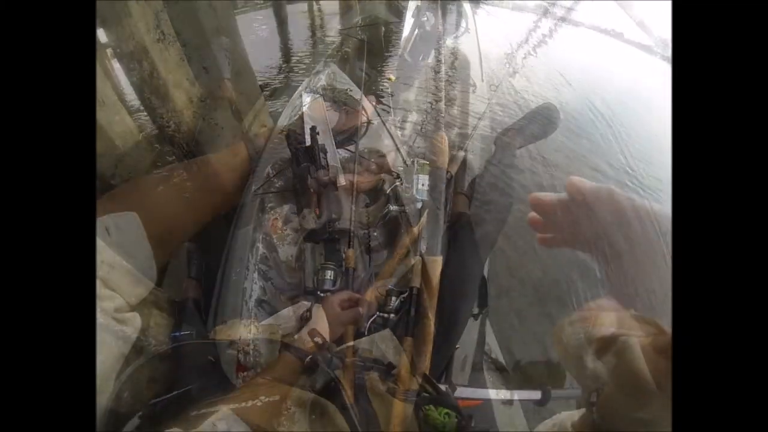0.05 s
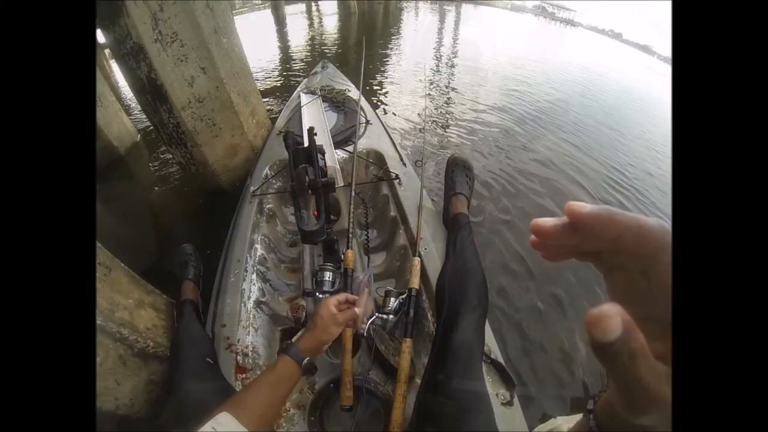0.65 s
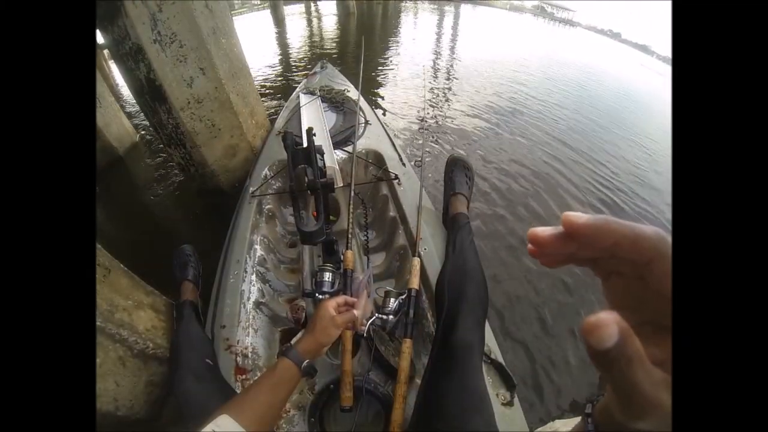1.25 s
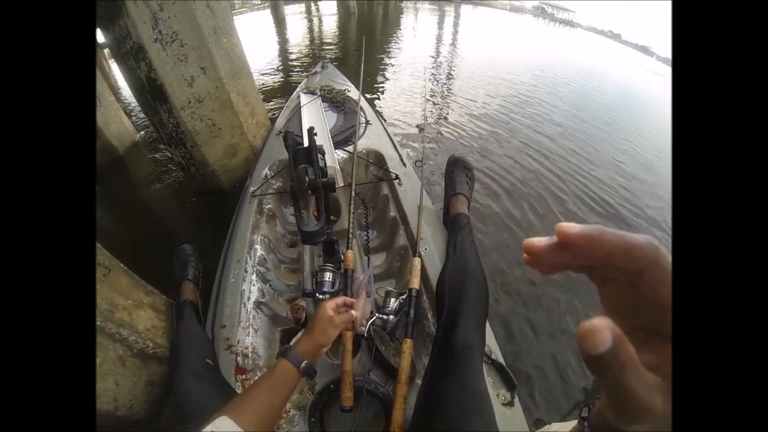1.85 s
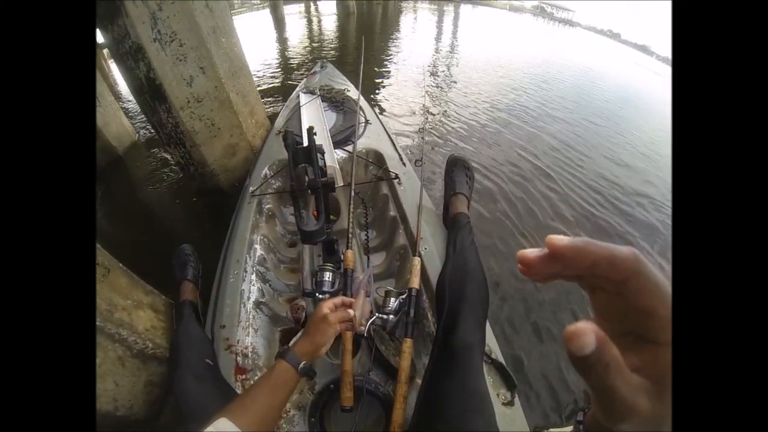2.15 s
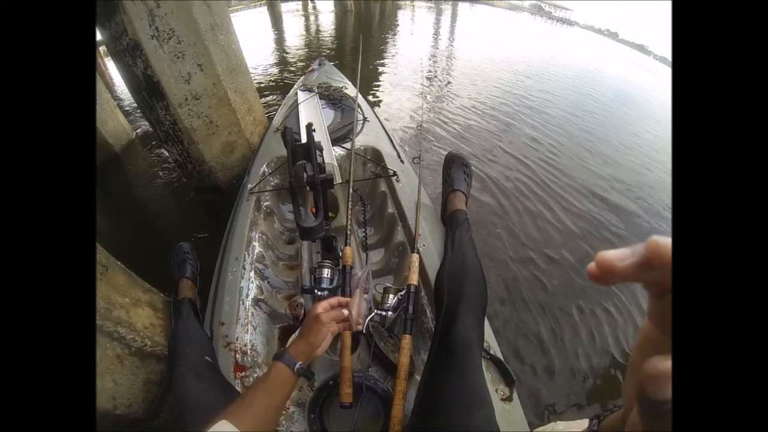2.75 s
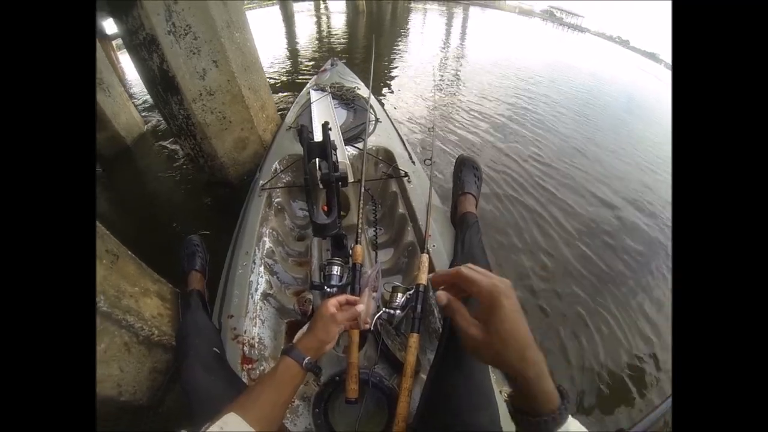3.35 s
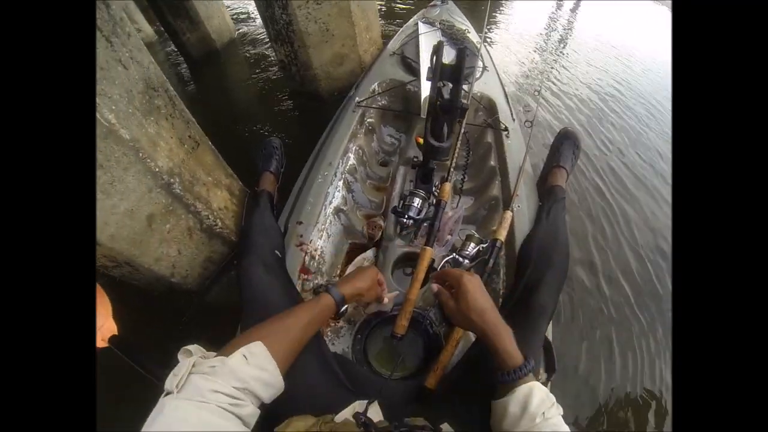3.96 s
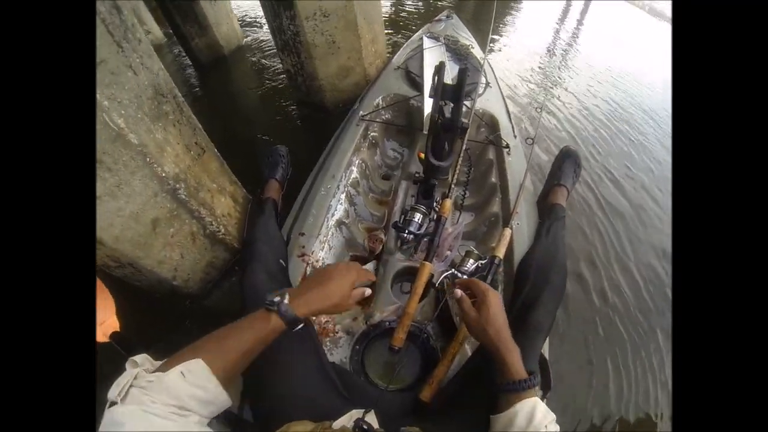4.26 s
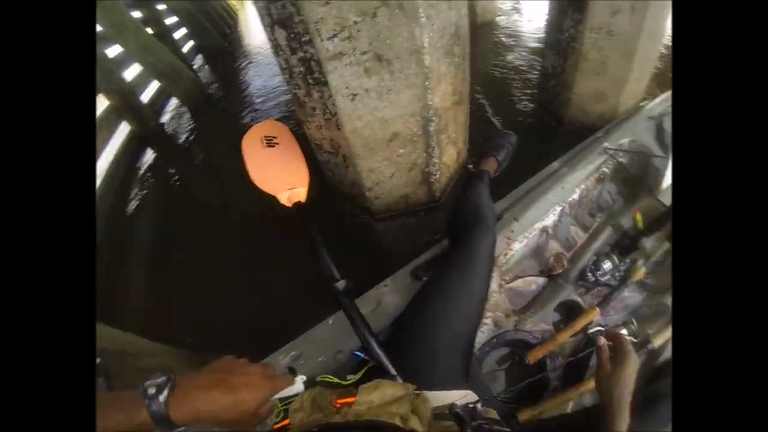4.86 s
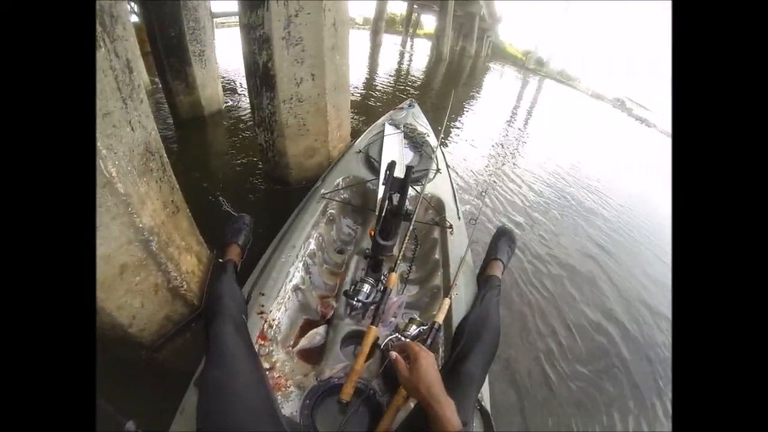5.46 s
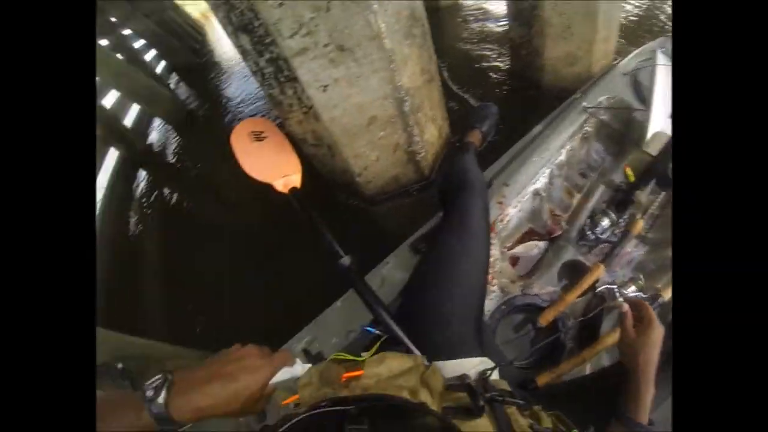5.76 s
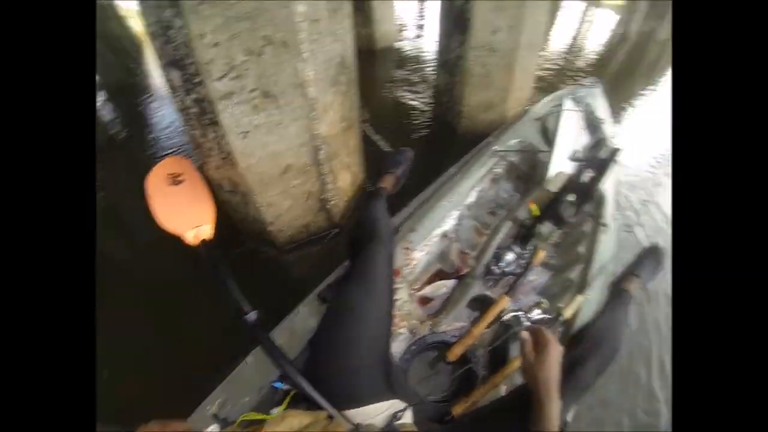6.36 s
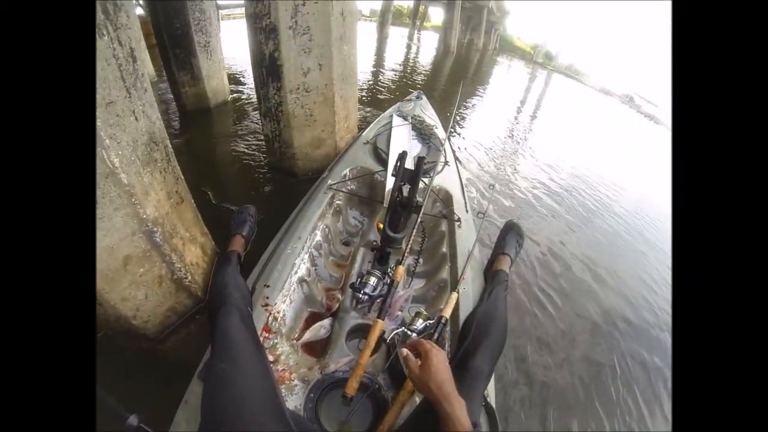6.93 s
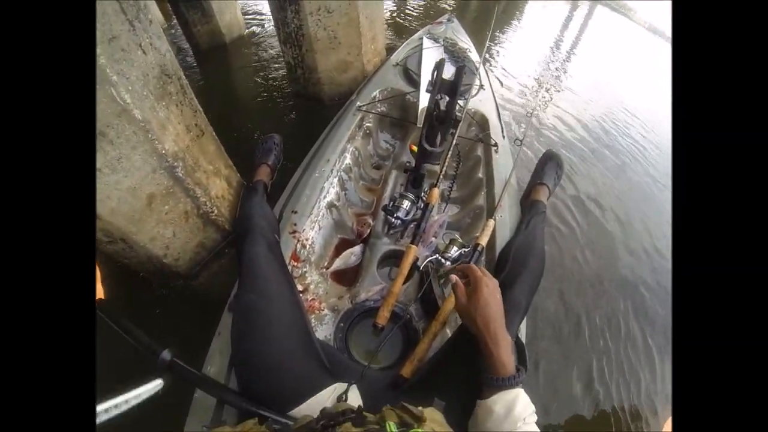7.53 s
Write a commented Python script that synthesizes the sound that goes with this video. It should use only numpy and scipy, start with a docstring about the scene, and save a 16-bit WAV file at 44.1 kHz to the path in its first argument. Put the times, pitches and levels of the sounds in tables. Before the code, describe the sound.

A brief burst of close, hollow knocks, scrapes, low thumps and clothing rustle opens, heard through a plastic camera housing in a kayak. It cuts to the low, steady rumble of a road bridge above, where a heavy engine slowly sinks in pitch and two vehicles pass in turn. Occasional light knocks of gear sound nearby, over a very faint, high, pulsing whine.

```python
"""Under a road bridge, in a kayak, heard by a camera in a plastic housing. Gear is handled: knocks and scrapes
ring the housing, the mount thumps, clothing rustles; then the scene changes. Traffic rumbles overhead: two
vehicles cross the span and a heavy engine coasts down. A few light knocks follow. The camera's electronics add
a faint, high, pulsing whine."""
import sys
import numpy as np
from scipy import signal
from scipy.fft import rfft, irfft, next_fast_len
from scipy.io import wavfile
from scipy.ndimage import uniform_filter1d

SR = 44100
rng = np.random.default_rng(int(sys.argv[2]) if len(sys.argv) > 2 else 0)


def master(y):
    """Save y as 16-bit WAV."""
    cut = np.clip(np.atleast_2d(y).T, -1, 1)
    pcm = np.round(cut * 32767)  # scale
    wavfile.write(sys.argv[1], SR, pcm.astype(np.int16))


N = 339129
TIME = np.arange(N) / SR
HANDLING_END_S, BAND_LIMIT_HZ = 0.773, 14900


# Each row: start in seconds, peak in dB, low-mode weight in dB, cut-off in Hz.
HOUSING_KNOCKS = [(0.2855, -35, -14, 7500), (0.286, -14.5, 8.5, 5700), (0.307, -29.5, -7, 2410),
                  (0.3466, -9.5, -5, 2100), (0.4105, -34.5, 4, 3200), (0.664, -24.5, -3.5, 2050),
                  (0.7498, -23.5, -25, 4460), (5.1094, -34, 3, 1760), (5.7296, -25.5, -1.5, 1810),
                  (6.9220, -45, 14, 1900), (7.2900, -33, 2.5, 1750)]

def knocks():
    """Gear strikes the housing; harder contact has a higher cut-off."""
    out = np.zeros(N)
    for start_s, db, low_db, cutoff_hz in HOUSING_KNOCKS:
        add(out, start_s, amp(db) * housing(low_db, cutoff_hz))
    return out


# Each row: frequency in Hz, swell in seconds, relative level in dB.
HOUSING_MODES = [(302, 0.003, -33), (477, 0.0023, -22), (682, 0.0027, -15.5), (942, 0.002, -26),
                 (1330, 0.0017, -17.5), (1504, 0.00072, -2), (1885, 0.00045, -18), (3140, 0.00068, -24),
                 (3754, 0.0015, -29), (4980, 0.00036, -27.5), (6360, 0.00028, -32)]

def housing(low_db, cutoff_hz, bright_db_per_oct=0):
    """One blow, peak 1: heavy blows favour the low modes, soft contact cuts the high ones."""
    low, high = 0, 0
    for hz, swell_s, db in HOUSING_MODES:
        if hz < 1000:
            low += amp(db + low_db) * ring(hz, swell_s)
        else:
            tilt_db = bright_db_per_oct * max(np.log2(hz / 1600), 0)
            high += amp(db + tilt_db) * ring(hz, swell_s)
    stiff_walls = signal.butter(5, 1120, "high", fs=SR, output="sos")
    contact = signal.butter(4, min(cutoff_hz, BAND_LIMIT_HZ), fs=SR, output="sos")
    out = signal.sosfilt(contact, low + signal.sosfilt(stiff_walls, high))
    return out / abs(out).max()


# Each row: start in seconds, envelope peak in dB, frequency in Hz, swell in seconds.
MOUNT_THUMPS = [(0.032, -23, 46, 0.01), (0.051, -20, 62, 0.0072), (0.206, -14.5, 21, 0.0054),
                (0.255, -15, 44.5, .009), (0.2883, -6.5, 53.4, 0.0087), (0.601, -24, 45, 0.013),
                (0.667, -30, 38, 0.009), (0.697, -14, 42.8, 0.013), (0.735, -24, 40, 0.0054),
                (3.366, -29, 25, 0.03), (3.373, -32, 66, 0.0058), (4.49, -33, 30, 0.028)]
TACKLE_TICKS = [(0.0363, -33.5, 1390, 0.001), (0.0360, -43, 2920, 0.00035), (0.195, -28, 1340, 0.0027),
                (0.537, -47, 1700, 0.0011), (0.5505, -54, 5440, 0.00024), (0.7476, -19.5, 1850, 0.0006),
                (1.307, -52, 2900, 0.00049), (1.316, -39, 2580, 0.00025), (1.3235, -59, 4730, .0004),
                (6.657, -47, 3400, .0008)]

def taps(rows):
    """Each tap rings one damped mode: low for the mount, high for tackle."""
    out = np.zeros(N)
    for start_s, db, hz, swell_s in rows:
        add(out, start_s, amp(db) * ring(hz, swell_s))
    return out


# Each row: start in seconds, length in seconds (capped at 0.1), rms in dB, low-mode weight in dB,
# brightness in dB per octave, cut-off in Hz.
HOUSING_SCRAPES = [(0.010, 0.13, -49, 2, 5, 7500), (0.03, 0.016, -46.5, 3, 8, 4500),
                   (0.126, 0.031, -36, -2.5, 6.5, 6500), (0.180, 0.026, -35, -36, 8, 11000),
                   (0.21, 0.0064, -44, -12, 8, 8000), (0.701, 0.012, -45.5, -2, 7.5, 13000),
                   (0.72, 0.023, -71, -10, -1, 11000)]

def scrapes(slips_per_s=5000):
    """Dense tiny slips ring the housing as something slides over it."""
    out, max_size = np.zeros(N), SR // 10
    for start_s, length_s, db, low_db, bright_db_per_oct, cutoff_hz in HOUSING_SCRAPES:
        slips = rng.standard_normal(max_size) * (rng.random(max_size) < slips_per_s / SR)
        size = min(int(length_s * SR), max_size)
        stroke = slips[:size] * signal.windows.tukey(size, 0.5)
        sound = signal.fftconvolve(stroke, housing(low_db, cutoff_hz, bright_db_per_oct))
        rms = np.sqrt(np.sum(sound ** 2) / size + 1e-20)
        add(out, start_s, amp(db) * sound / rms)
    return out


# Each row: frequency in Hz, relative level in dB.
SWAY_SPECTRUM = [(8.8, -30), (15, 14), (23, 5.5), (33, -0.5), (114, -23), (145, -18), (219, -43),
                 (300, -31.5), (390, -61), (660, -120)]
RUSTLE_SPECTRUM = [(120, 4.5), (200, 1.5), (480, -9), (760, -7), (1000, -13.5), (1540, 1), (2200, -16),
                   (3800, -22), (4500, -32), (5500, -26), (7500, -34), (8500, -38.5), (13000, -42.5)]

def handling(grip_s=0.11, grip_db=5.5):
    """The mount sways and clothing rustles; the grip tightens just before the end."""
    grip = amp(grip_db * ramp(HANDLING_END_S - grip_s, grip_s))
    folds_db = 1.7 * drift(40)
    sway = amp(-29.5) * noise(SWAY_SPECTRUM)
    rustle = amp(-49.5 + folds_db) * noise(RUSTLE_SPECTRUM)
    return grip * (sway + rustle)


# Each row: arrival in seconds, approach in seconds, tyres in dB, roar in dB, hold in seconds,
# fade in dB per second, engine note in Hz, note width in Hz, note in dB.
SPAN_VEHICLES = [(3.007, 0.74, -55, -57, 1.26, 5.5, 157.4, 11, -58),
                 (6.231, .3, -55.5, -57.5, 1.05, 9, 143.7, 4.5, -53)]
# Each row: frequency in Hz, relative level in dB.
ROAR_SPECTRUM = [(94, -15), (160, -2), (183, -4), (230, -7.5), (290, -6), (384, -12), (434, -8), (521, -11),
                 (630, -9.5), (920, -16.5), (1070, -16.5), (1150, -14), (1500, -57), (2530, -120)]

def traffic(far_roar_db=-65.5):
    """Vehicles roar across the span over distant traffic; the uneven road flutters roar and tyres."""
    gain = amp(far_roar_db)
    for start_s, _, _, roar_db, hold_s, fade_db_per_s, *_ in SPAN_VEHICLES:
        gain = power_sum(gain, amp(roar_db) * crossing(start_s, hold_s, fade_db_per_s))
    flutter = drift(25)
    rumble = deck_rumble()
    roar = gain * amp(0.86 * flutter) * noise(ROAR_SPECTRUM)
    return rumble + roar + amp(0.54 * flutter) * tyres()


# Each row: frequency in Hz, relative level in dB.
DECK_SPECTRUM = [(12, -6), (24, 2), (36, -1), (60, -13), (100, -21), (160, -25), (260, -45)]

def deck_rumble(far_db=-54, loaded_db=-44.5, lag_s=0.23):
    """The first vehicle loads the deck, which rumbles on."""
    loaded = crossing(SPAN_VEHICLES[0][0] + lag_s, hold_s=0, fade_db_per_s=0)
    return np.maximum(amp(far_db), amp(loaded_db) * loaded) * noise(DECK_SPECTRUM)


# Each row: frequency in Hz, relative level in dB.
TYRE_SPECTRUM = [(590, -4.5), (1000, -20.5), (1230, -0.5), (1330, -0.5), (1440, 5.5), (1510, 7.5),
                 (1620, 3.5), (1850, -13), (2000, -16.5), (2600, -43), (4400, -120)]
SIZZLE_SPECTRUM = [(1180, -9.5), (2000, -5.5), (2210, -2.5), (2390, -1.5), (2590, -9), (2720, -10.5),
                   (2930, -1), (3040, 1), (3280, -6), (3620, -2.5), (3970, -12), (4300, -17.5), (5250, -13),
                   (5900, -19), (6100, -15.5), (7930, -22), (13400, -120)]

def tyres(far_roll_db=-61, far_sizzle_db=-72.5, nearest_s=5.52, width_s=2.8):
    """A stream of tyres swells and ebbs once; each vehicle peaks, then the deck screens it."""
    stream = ramp(start_s=1.67, length_s=0.28) / np.hypot(1, (TIME - nearest_s) / width_s)
    roll = power_sum(amp(far_roll_db), amp(-60) * stream)
    sizzle = power_sum(amp(far_sizzle_db), amp(-64) * stream)
    for start_s, approach_s, tyres_db, *_ in SPAN_VEHICLES:
        past_peak_s = TIME - start_s - 0.27
        slope_s = np.where(past_peak_s < 0, approach_s, 0.2)
        roll = power_sum(roll, amp(tyres_db) / (1 + (past_peak_s / slope_s) ** 2))
    return roll * noise(TYRE_SPECTRUM) + sizzle * noise(SIZZLE_SPECTRUM)


def span_boom(peak_s=3.03, width_s=0.63):
    """A low, narrow resonance of the span swells as the first vehicle arrives."""
    swell = np.exp(-((TIME - peak_s) / width_s) ** 2)
    return amp(-53.5) * swell * band(hz=77.25, width_hz=1.9)


def vehicle_engines(octave_db=-9):
    """Each crossing vehicle drones on a rough note and its octave."""
    out = np.zeros(N)
    for start_s, _, _, _, hold_s, fade_db_per_s, hz, width_hz, db in SPAN_VEHICLES:
        note = drone(hz, width_hz, start_s) + amp(octave_db) * drone(2 * hz, 2 * width_hz, start_s)
        out += amp(db) * crossing(start_s, hold_s, fade_db_per_s) * note
    return out


def drone(hz, width_hz, start_s, sag_per_s=0.041):
    """A rough engine note that sinks as it goes by."""
    note = signal.hilbert(band(hz, width_hz), next_fast_len(N))[:N]
    sag_rad = np.pi * hz * sag_per_s * (TIME - start_s) ** 2
    return (note * np.exp(-1j * sag_rad)).real


# Each row: multiple of the cycle rate, then level in dB at the highest, middle and lowest speed.
ENGINE_ORDERS = [(4, -72, -66, -70), (5, -66, -64, -62.5), (6, -66, -59, -59.5), (7, -69.5, -67.5, -73),
                 (8, -62.5, -63.5, -74), (9, -75, -77, -69), (10, -71, -75.5, -79)]

def heavy_engine(cruise_hz=19.22, lift_s=1.95, drop_hz=0.5, coast_hz_per_s=0.345):
    """The engine cruises, drops as the throttle lifts, then coasts down; its orders swell and fade."""
    coasting_s = np.maximum(TIME - lift_s, 0)
    cycle_hz = cruise_hz - drop_hz * ramp(lift_s, length_s=0.45) - coast_hz_per_s * coasting_s
    cycles = np.cumsum(cycle_hz) / SR
    slowed = (cycle_hz.max() - cycle_hz) / np.ptp(cycle_hz)
    out = np.zeros(N)
    for order, *levels_db in ENGINE_ORDERS:
        rms_db = np.interp(slowed, [0, 0.5, 1], levels_db) + 0.62 * drift(1.4)
        out += np.sqrt(2) * amp(rms_db) * np.sin(2 * np.pi * (order * cycles + rng.random()))
    return out


# Each row: frequency in Hz, relative level in dB.
HISS_SPECTRUM = [(300, 6), (3500, -4), (5500, -11.5), (7100, -19), (8200, -9), (11500, -14.5), (13500, -14),
                 (14500, -38)]

def electronics(whine_hz=6449.5, frame_hz=47.9485):
    """A whine and its octave pulse once a frame, longer and louder at first, over a soft hiss."""
    frames = (TIME - 0.0082) * frame_hz + 1
    early = TIME < HANDLING_END_S
    duty = np.where(early, 0.8, 0.43)
    gate = uniform_filter1d(1.0 * (frames % 1 < duty), size=40)
    jitter_rad = 1.03 * rng.standard_normal(int(frames[-1]) + 1)
    phase = 2 * np.pi * whine_hz * TIME + jitter_rad[frames.astype(int)]
    whine = amp(-68) * np.sin(phase) + amp(-70) * np.sin(2 * phase)
    return gate * whine * amp(3 * early) + amp(-74) * noise(HISS_SPECTRUM)


def crossing(start_s, hold_s, fade_db_per_s):
    """Gain of a vehicle on the span: quick rise, hold, fade."""
    fading_s = np.maximum(TIME - start_s - hold_s, 0)
    return ramp(start_s, length_s=0.21) ** 0.5 * amp(-fade_db_per_s * fading_s)


def ring(hz, swell_s):
    """A damped mode whose envelope swells to 1 and dies away."""
    t = np.arange(SR // 4) / SR
    return t / swell_s * np.exp(1 - t / swell_s) * np.sin(2 * np.pi * hz * t)


def noise(spectrum):
    """Noise of rms 1, shaped by (Hz, dB) points."""
    size = next_fast_len(N)
    bins_hz = np.fft.rfftfreq(size, 1 / SR)
    hz, db = np.transpose(spectrum)
    gain = amp(np.interp(np.log(bins_hz + 1), np.log(hz + 1), db, left=-120, right=-120))
    return unit(irfft(rfft(rng.standard_normal(size)) * gain, size)[:N])


def band(hz, width_hz):
    """Narrow noise around hz."""
    return noise([(hz - 2 * width_hz, -25), (hz, 0), (hz + 2 * width_hz, -25)])


def drift(top_hz):
    """Random wander of rms 1."""
    rates_hz = top_hz * np.geomspace(1 / 8, 1, num=16)
    t = TIME[::200]
    waves = np.sin(2 * np.pi * (rates_hz * t[:, None] + rng.random(len(rates_hz))))
    return np.interp(TIME, t, unit(waves.sum(1)))


def ramp(start_s, length_s):
    """Linear rise from 0 to 1."""
    return np.clip((TIME - start_s) / length_s, 0, 1)


def power_sum(*gains):
    """Unrelated sounds add by power."""
    return np.sqrt(sum(g ** 2 for g in gains))


def amp(db):
    """Decibels to gain."""
    return 10 ** (np.asarray(db) / 20)


def unit(x):
    """Scales to rms 1."""
    return x / np.sqrt(np.mean(x ** 2) + 1e-20)


def add(mix, start_s, sound):
    """Mixes a sound in at start_s."""
    part = mix[round(start_s * SR):][:len(sound)]
    part += sound[:len(part)]


def scene():
    """The scene changes at once from the handling to the traffic under the bridge."""
    busy = uniform_filter1d(1.0 * (TIME < HANDLING_END_S), size=100)
    gear = handling()
    bridge = traffic() + span_boom() + heavy_engine() + vehicle_engines()
    contacts = knocks() + taps(TACKLE_TICKS) - taps(MOUNT_THUMPS) + scrapes()
    return (busy * gear + (1 - busy) * bridge + contacts + electronics())[None]


def record(dry):
    """Steep low-pass at the camera's band limit."""
    lowpass = signal.firwin(511, BAND_LIMIT_HZ, window=("kaiser", 9), fs=SR)
    return signal.oaconvolve(dry, lowpass[None], "same")


dry = scene()
out = record(dry)
master(out)
```